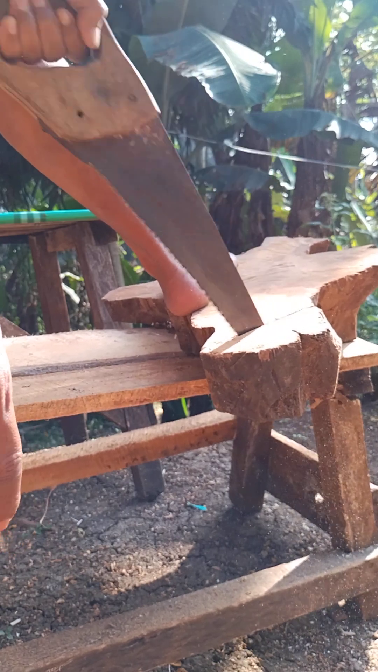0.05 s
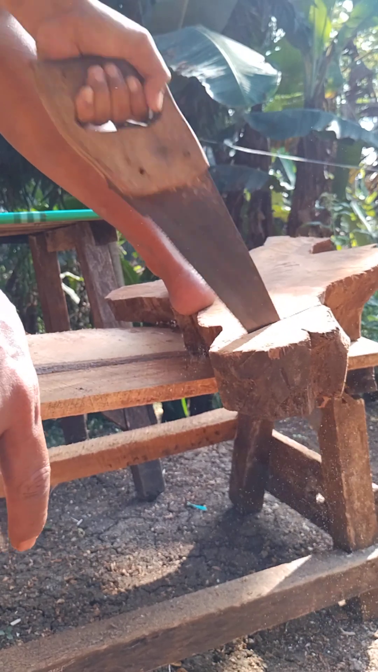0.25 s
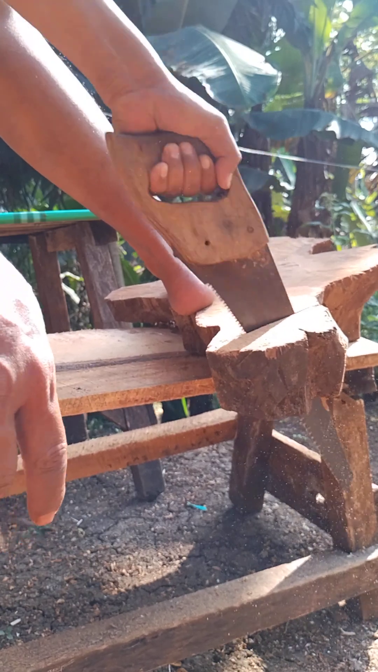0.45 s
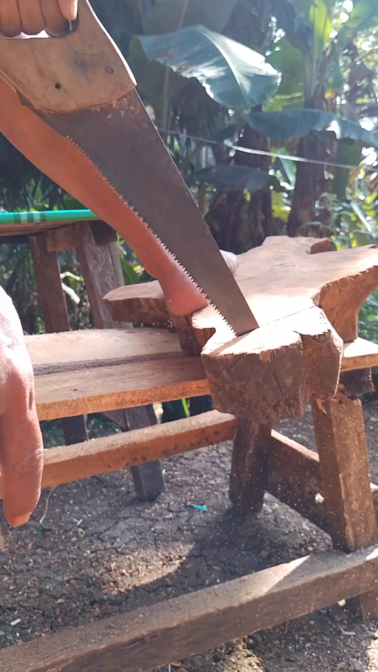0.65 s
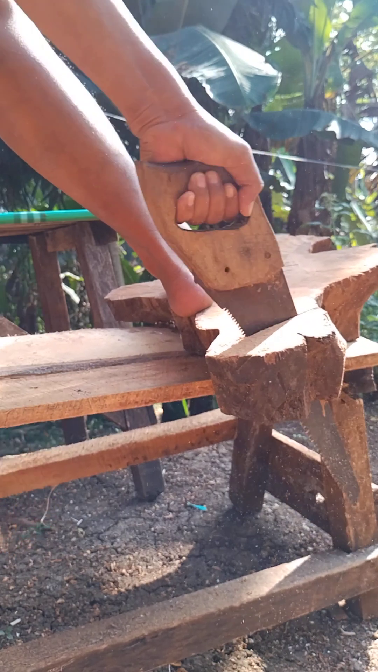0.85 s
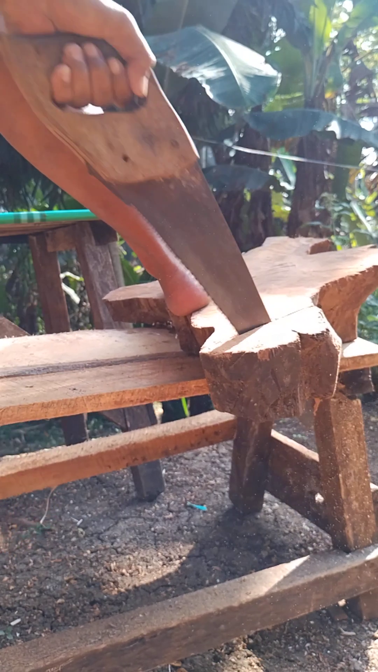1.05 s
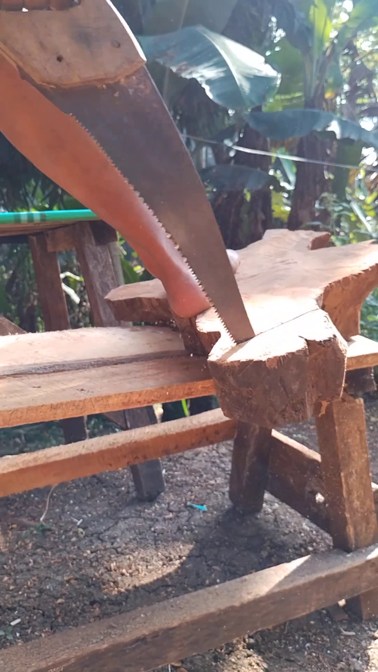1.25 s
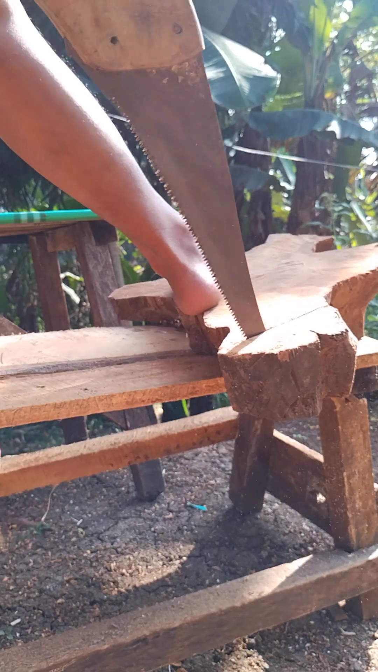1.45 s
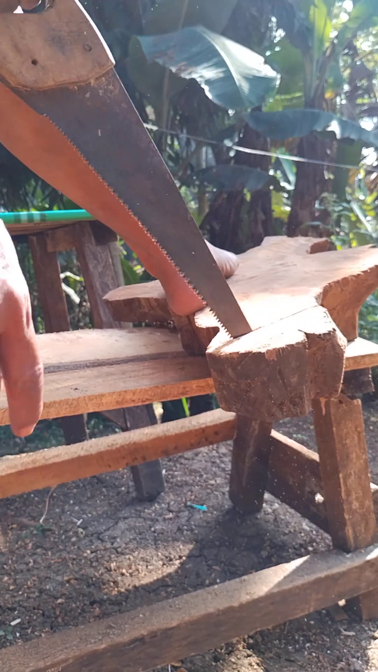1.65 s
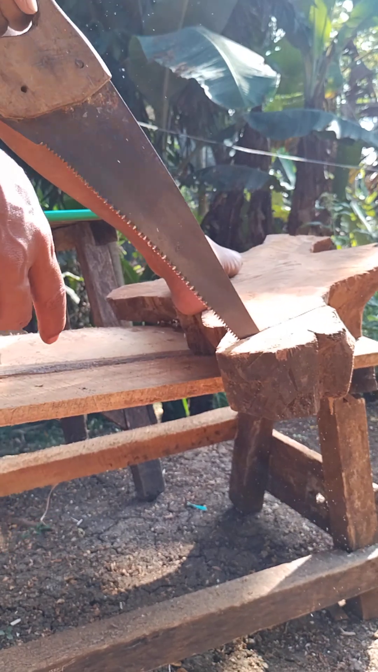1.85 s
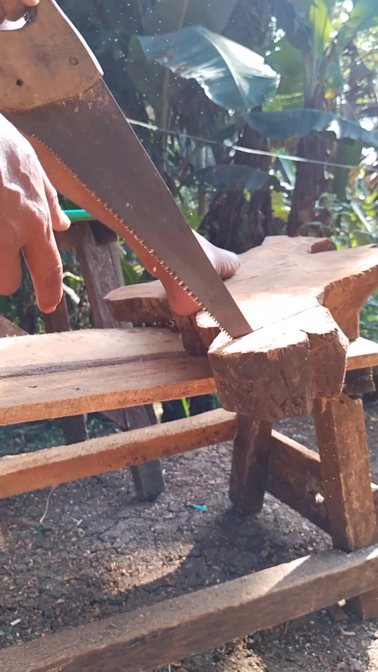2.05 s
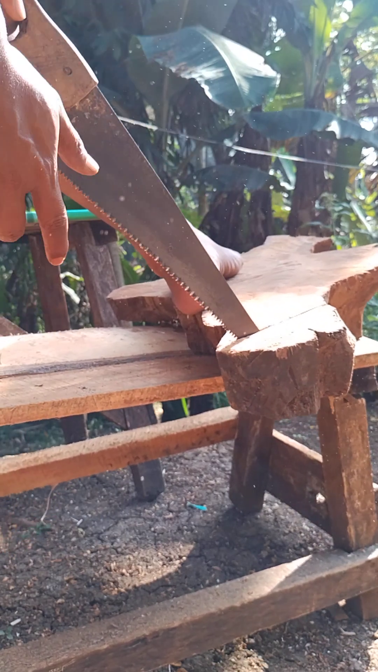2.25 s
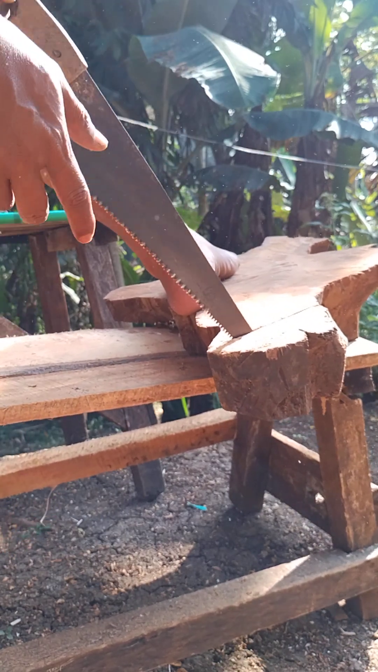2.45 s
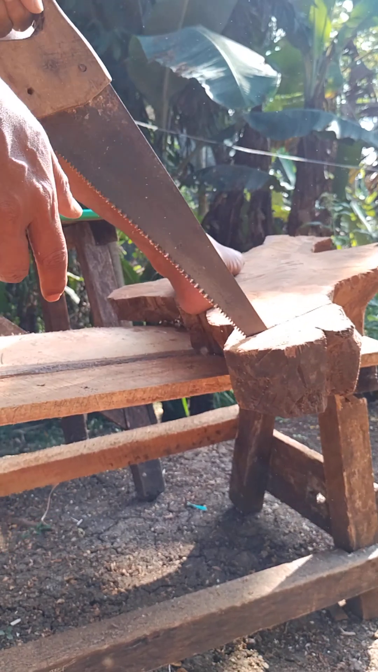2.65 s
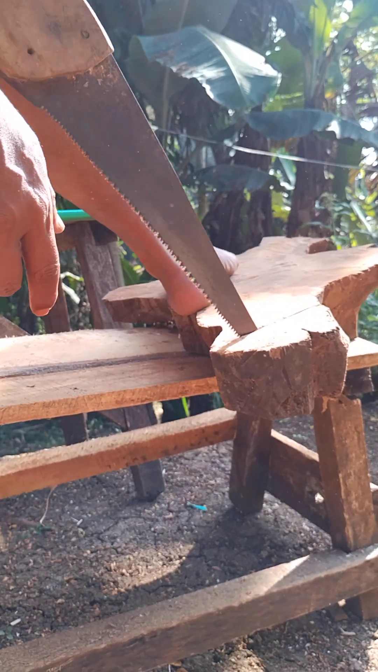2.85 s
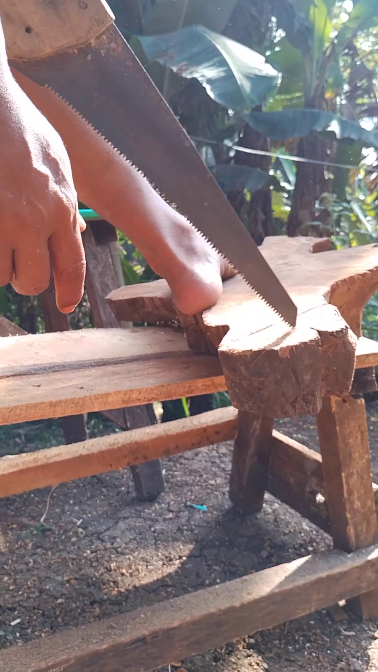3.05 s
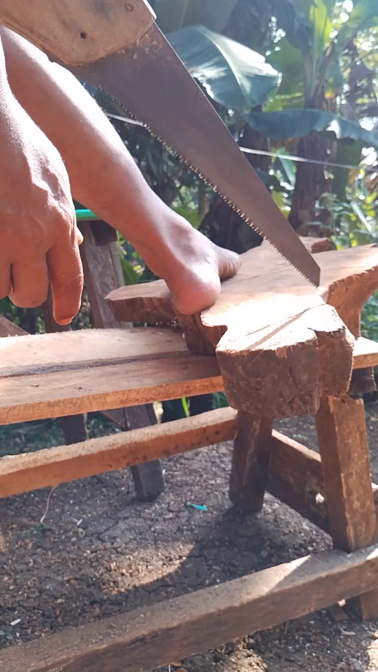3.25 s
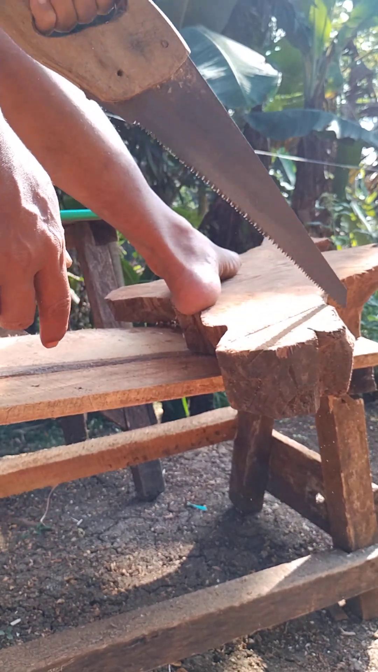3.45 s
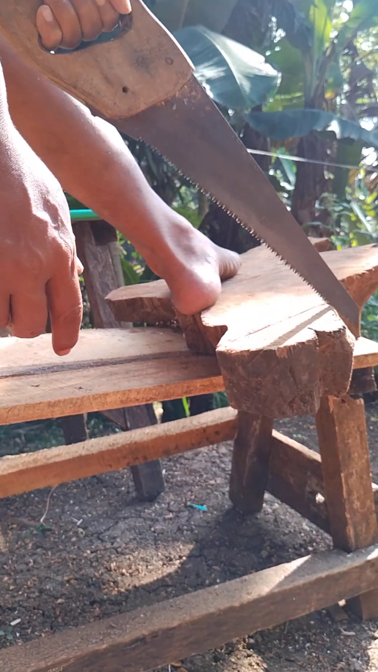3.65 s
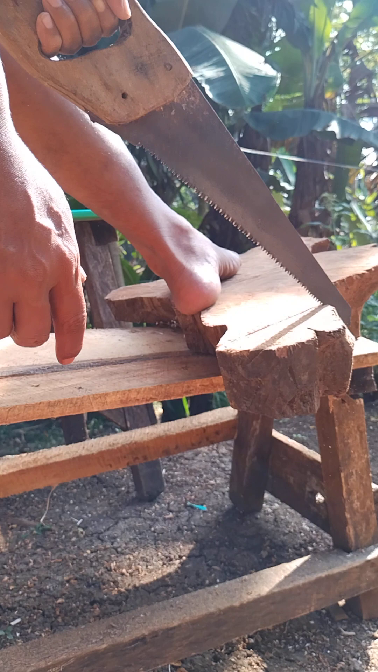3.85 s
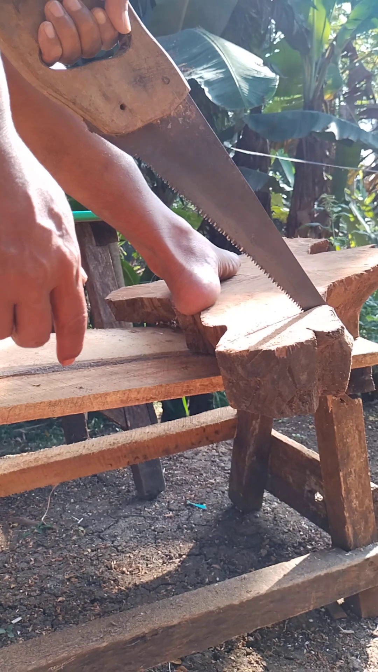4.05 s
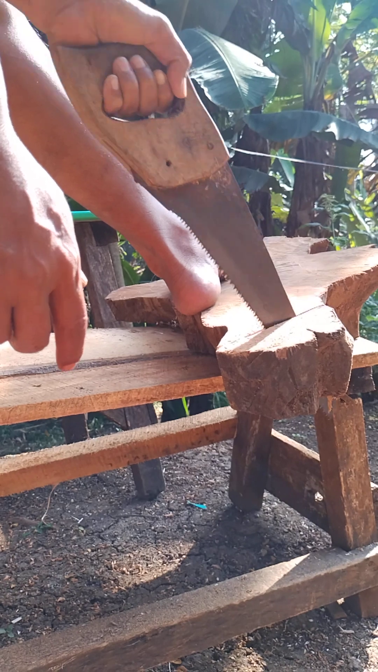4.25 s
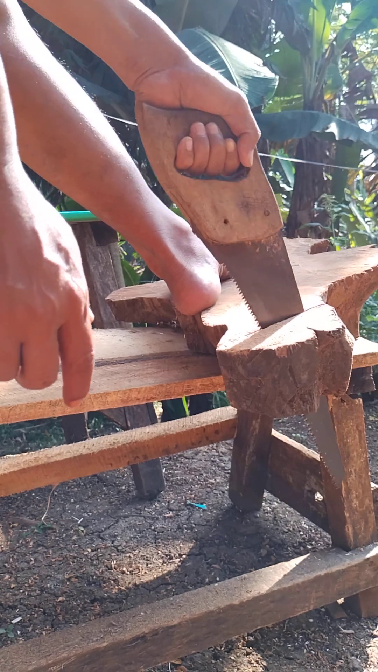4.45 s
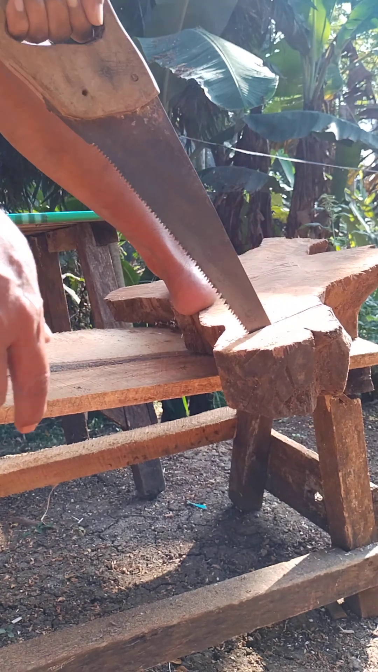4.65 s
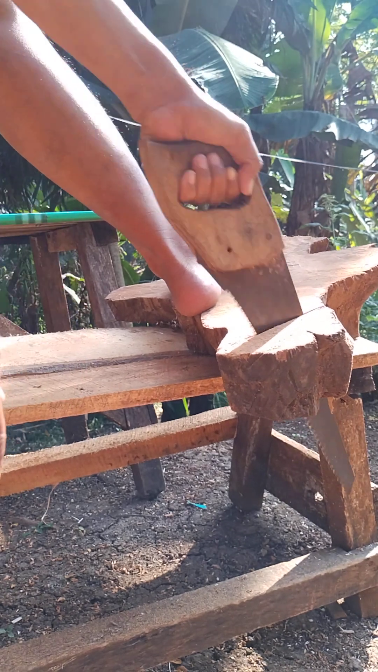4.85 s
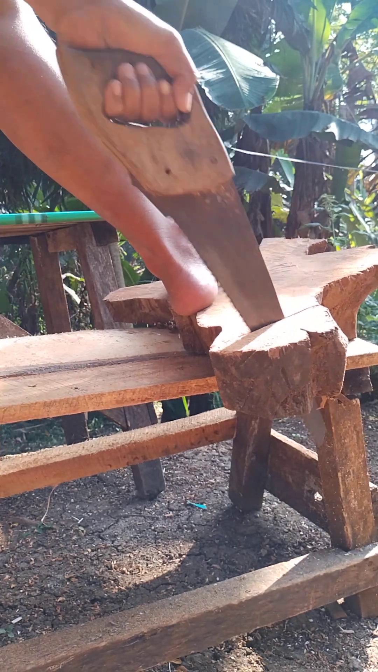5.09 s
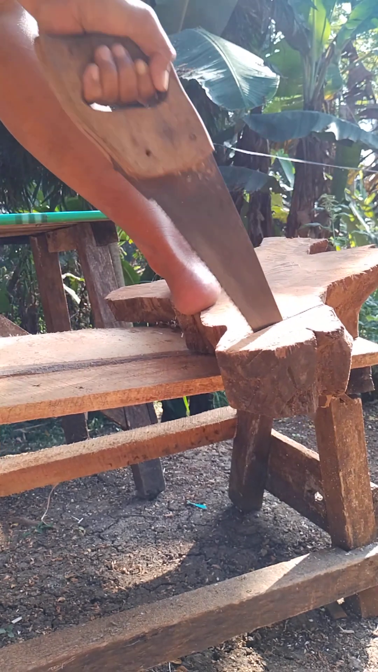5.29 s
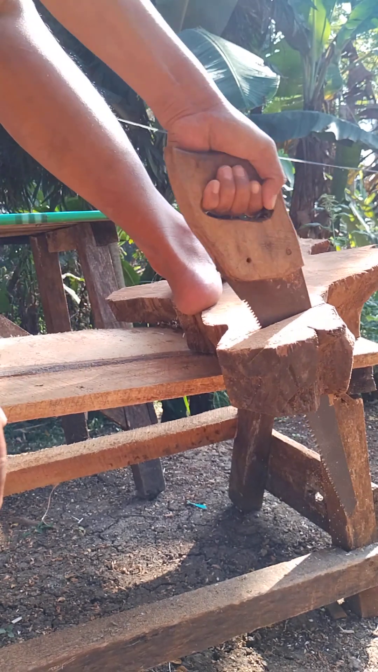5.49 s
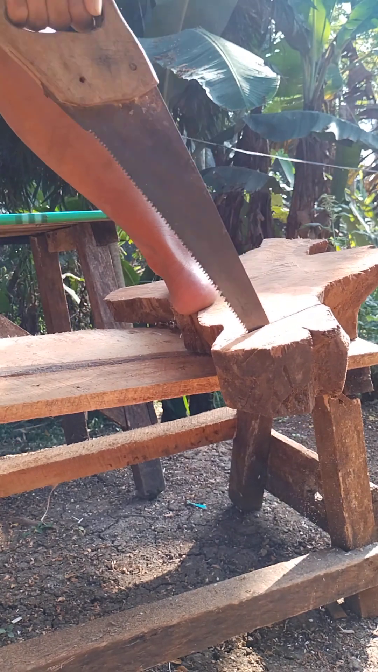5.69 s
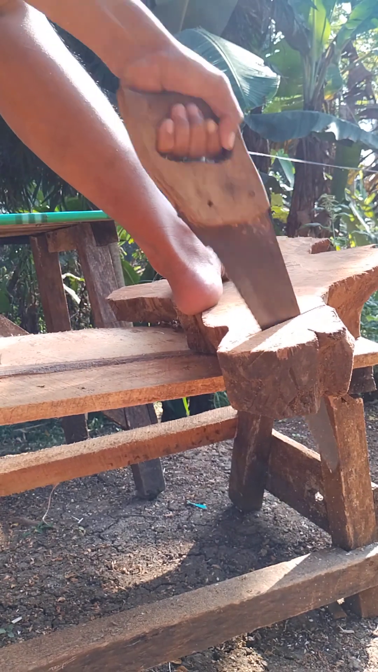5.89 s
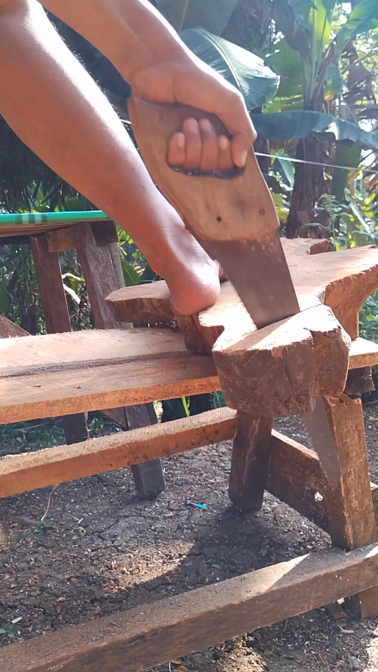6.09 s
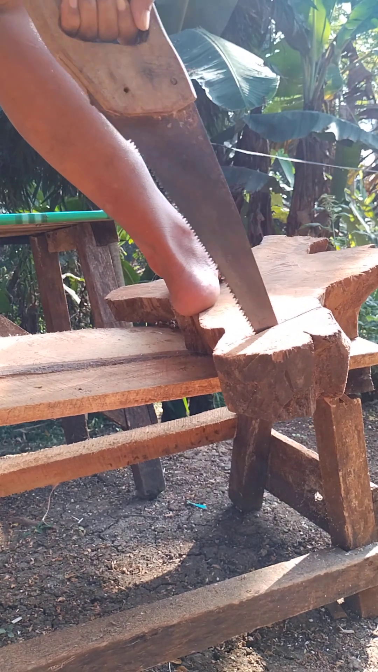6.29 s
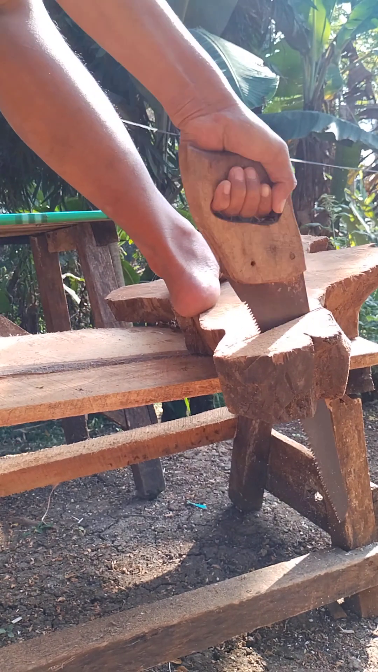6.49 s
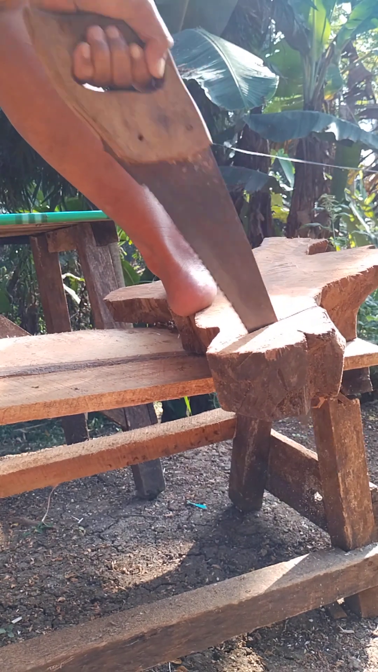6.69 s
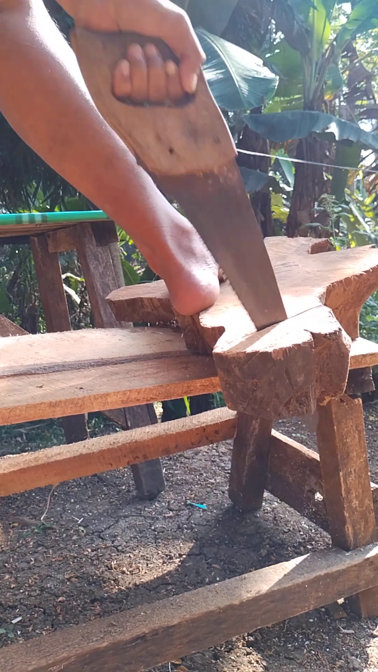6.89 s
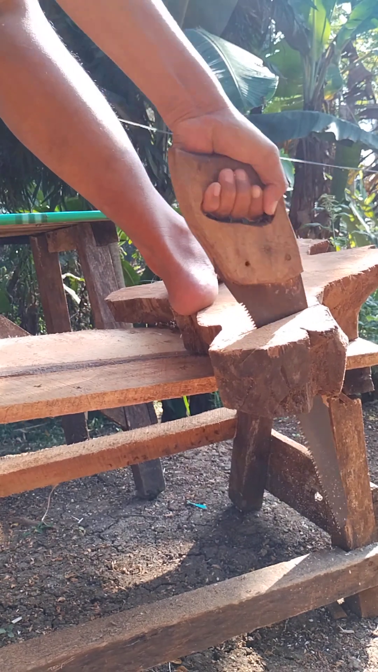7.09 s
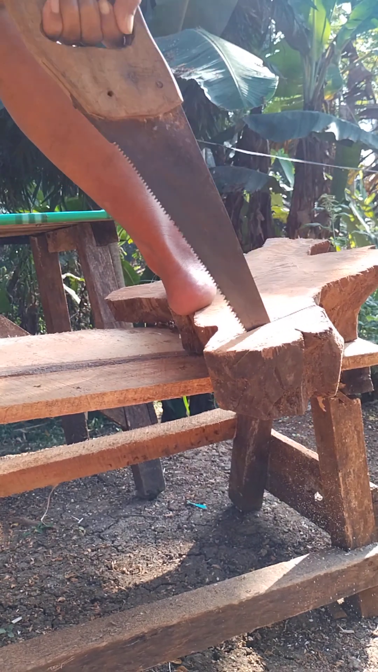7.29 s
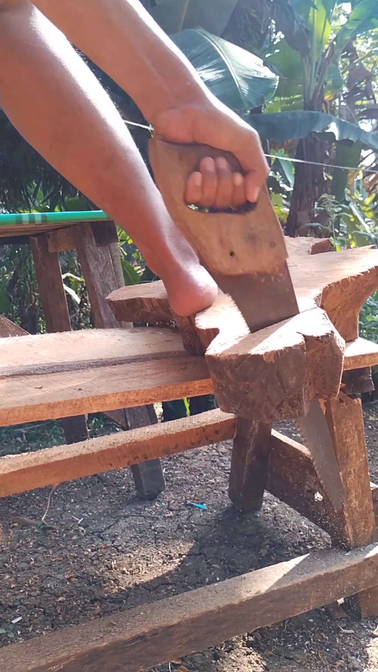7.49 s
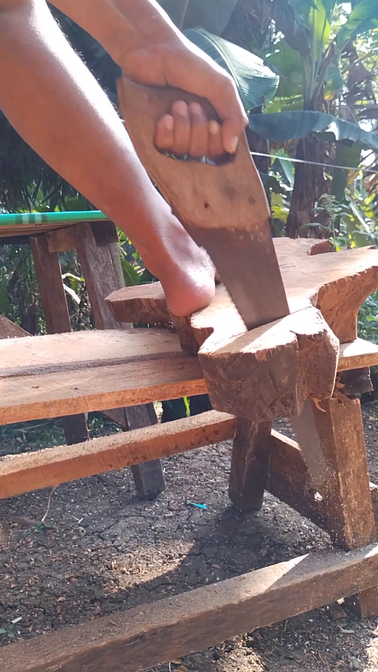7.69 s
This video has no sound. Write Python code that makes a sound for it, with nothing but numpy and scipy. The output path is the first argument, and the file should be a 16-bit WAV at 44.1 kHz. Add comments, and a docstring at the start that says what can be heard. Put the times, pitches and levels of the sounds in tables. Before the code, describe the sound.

A handsaw rasps through a hard log outdoors, pauses with light knocks and scrapes, then saws on over a high insect hiss.

```python
"""Handsaw on a log, outdoors

Close to a stereo microphone, a handsaw cuts a hard log on a bench, rests with light knocks and scrapes,
is set into the cut again and saws on. The teeth tear fibres in a dense crackle that rings blade and
wood. Behind are an insect chorus, one nearer cricket and a far engine; a breeze brushes the microphone."""
import sys
import numpy as np
from scipy import signal
from scipy.fft import rfft, irfft, next_fast_len
from scipy.io import wavfile
from scipy.ndimage import uniform_filter1d

SR = 44100
rng = np.random.default_rng(int(sys.argv[2]) if len(sys.argv) > 2 else 0)


def master_out(mix):
    """Clip the mix to full scale and print it as 16-bit PCM to the path in sys.argv[1]."""
    frames = np.transpose(np.atleast_2d(mix))
    ceiling = np.clip(frames, -1, 1)
    pcm = np.round(ceiling * 32767).astype(np.int16)
    wavfile.write(sys.argv[1], SR, pcm)


N = 340893
T = np.arange(N) / SR
SIZE = next_fast_len(N + 4096, True)
HZ = np.fft.rfftfreq(SIZE, 1 / SR)

# Table levels are relative; each source sets its own gain.
# far wash of the neighbourhood: (frequency [Hz], level [dB])
WASH_SPECTRUM = [(12, -35), (20, -0.5), (75, -13), (130, -4), (200, -9.5), (260, -16), (310, -22),
                 (500, -24), (1000, -32), (2000, -33.5), (4100, -39), (5300, -70)]
# far engine: (time [s], second order [Hz], its level [dB], third order level [dB])
ENGINE_ORDERS = [(0, 176, -65.5, -89), (.3, 182, -68, -84), (.45, 170, -72, -78), (1.3, 158, -83, -79),
                 (1.9, 162, -64, -74), (2.5, 162, -64, -71.5), (3.05, 160, -59.5, -71),
                 (3.3, 156, -96, -80), (3.8, 154, -93, -65.5), (4.5, 156, -78.5, -75.5),
                 (5.2, 150, -79, -70), (7.73, 147, -68, -71)]
# breeze on the microphone: (time [s], level [dB])
BREEZE_LEVELS = [(0, -57), (1.1, -61.5), (1.7, -64.5), (2.4, -62), (3.7, -73.5), (4.5, -62), (5.6, -62),
                 (5.75, -52), (5.9, -61.5), (7.73, -61.5)]
# far insects: (frequency [Hz], level [dB])
CHORUS_SPECTRUM = [(2940, -71.5), (5000, -56.5), (5800, -40.5), (6080, -42), (6560, -42.5), (7180, -35.5),
                   (7610, -26), (7940, -18.5), (8570, -6), (9750, -2.5), (11100, -15.5), (12400, -28.5),
                   (15600, -47.5)]
# nearer cricket: ((frequency [Hz], width [Hz]), level [dB])
CRICKET_NOTE = (4560, 300), -76

# pulls and pushes in turn, a pull first:
# (middle [s], rise [s], hold [s], release [s], tooth pressure [dB], change across the hold [dB])
SAW_STROKES = [(0.105, 0.095, 0.0341, 0.12, -46, 1.5), (0.39, 0.074, 0.057, 0.08, -46, -6),
               (0.639, 0.071, 0.099, 0.0715, -50.5, -4), (0.911, 0.1, 0.037, 0.06, -44.5, -7),
               (1.173, .12, 0.086, 0.084, -49.5, -3), (4.366, 0.037, 0.17, 0.069, -58, 6.5),
               (4.689, 0.11, 0.066, 0.06, -52, -1), (4.911, 0.085, 0.053, 0.0806, -46, 0),
               (5.188, 0.082, 0.0719, 0.1, -49.5, -2), (5.429, 0.078, 0.048, 0.094, -46.5, 1.3),
               (5.716, 0.091, 0.11, 0.051, -49.5, -3.9), (5.984, .13, 0.0322, 0.087, -47, 0),
               (6.235, 0.075, 0.077, 0.11, -51, -0.38), (6.489, 0.088, 0.046, 0.088, -48, 5.5),
               (6.761, 0.073, 0.11, 0.071, -51, -1), (7.031, 0.088, 0.047, 0.0902, -46, -3.5),
               (7.306, 0.1, 0.089, 0.077, -50, -1.5), (7.53, 0.0728, 0.03, .107, -45.5, 4.5),
               (7.805, 0.077, .07, .08, -48.5, -2.5)]
# the resting blade drags: (peak [s], rise [s], release [s], pressure [dB], wood's share [dB])
REST_SCRAPES = [(1.418, 0.187, 0.03, -73.5, -11), (1.494, 0.061, .08, -74.5, -6),
                (1.626, 0.036, 0.102, -72.5, -1), (1.746, 0.065, .06, -76.5, -16),
                (2.25, .15, 0.46, -89.5, 13.5), (2.594, 0.094, 0.067, -68.5, -4.5),
                (2.712, 0.011, 0.0463, -67.5, -15), (2.848, .02, 0.04, -75, -5),
                (2.99, 0.136, 0.22, -70, -1), (3.104, .008, 0.077, -64.5, 0.5), (3.16, .08, .03, -78, 2.5),
                (3.646, .015, 0.11, -80, 5), (3.806, .06, 0.077, -78.5, 5),
                (3.904, 0.054, 0.108, -66.5, 2.45), (3.966, .008, .15, -68, 1.5),
                (4.1, 0.041, 0.062, -64.5, 0.5)]
# the blade slips into the cut: (rise [s], hold [s], release [s], pressure [dB])
SLIP_SHAPE = (0.0433, 0.0024, 0.01, -48)
# blade touching wood: (time [s], note level [dB], note [Hz], log level [dB], scuff level [dB])
BLADE_KNOCKS = [(1.362, -71, 345, -71, -65), (1.409, -72, 417, -77, -67), (1.511, -69, 354, -75, -80),
                (1.620, -59, 370, -78, -61.5), (1.66, -68, 335, -81, -72), (2.212, -71, 449, -68, -80),
                (2.253, -78.5, 410, -68, -80), (2.593, -64, 337, -74, -63), (2.679, -67, 380, -69, -63.5),
                (2.708, -76.5, 330, -78, -62.5), (3.102, -50.5, 357, -50.5, -66),
                (3.137, -57, 354, -75, -78), (3.641, -67, 338, -62.5, -77), (3.793, -71, 975, -72, -75),
                (3.87, -75, 907, -75, -73), (3.962, -75, 991, -76, -55.5), (4.089, -79, 1014, -66, -78)]
# teeth catching as a stroke begins: (time [s], push level [dB], push [Hz], bench level [dB])
TOOTH_CATCHES = [(0.019, -56, 121, -59.5), (0.334, -49, 183, -59.5), (0.528, -51, 167, -65),
                 (0.838, -46.5, 199, -60.5), (1.029, -52, 250, -65), (4.858, -50, 178, -65),
                 (5.388, -53, 156, -69.5), (5.893, -48, 170, -61.5), (6.43, -47, 164, -61.5),
                 (6.645, -55.5, 218, -69), (6.965, -43.5, 138, -64), (7.169, -52, 164, -67.5),
                 (7.48, -55, 135, -73.5)]
# tearing fibres: (frequency [Hz], level [dB])
RASP_SPECTRUM = [(150, -51), (250, -20), (337, -12.5), (400, -15.5), (887, -7), (953, -7), (1500, -5),
                 (1810, -6.5), (2810, -9), (7500, 1), (9750, -3), (16500, -120)]
# bright hiss of the toothed edge: (frequency [Hz], level [dB])
EDGE_SPECTRUM = [(4000, -9), (7000, -7), (8500, 3), (10500, 2.5), (12000, -11), (14000, -10.5),
                 (15700, -17)]
# steel plate: (frequency [Hz], width [Hz], level [dB])
PLATE_MODES = [(1457, 16.8, 1), (1877, 170, -4.5), (2415, 680, -4.5), (3102, 560, -7.5), (3680, 23, 1),
               (3947, 30, -4), (4880, 57, -5.5), (5862, 36, -8)]
# blade bending between handle and cut, at zero depth: (frequency [Hz], width [Hz], level [dB])
BENDING_MODES = [(135, 35, 12), (230, 40, 8), (325, 45, 10), (480, 50, 10)]
# log and bench: (frequency [Hz], width [Hz], level [dB])
LOG_MODES = [(351.6, 12.5, 1.5), (545, 126, 0), (818.4, 27, 9.5), (960, 91, 3), (1395, 212, 0.5)]
BENCH_MODE, HOLLOW_MODE = (345, 25, 14), (965, 49, 12.9)  # same columns; driven by blade depth

# likeness of left and right: (frequency [Hz], coherence [0-1])
MIC_COHERENCE = [(30, 0.374), (130, 1), (300, 0.817), (640, 0.706), (1400, 0.153), (3000, 0.037),
                 (8000, 0.054)]
# colour of the microphone ports: (frequency [Hz], left minus right [dB])
MIC_BALANCE = [(60, 0.5), (130, 2), (290, -1.5), (640, 1), (3000, 0), (6500, 0), (8000, 5.5),
               (10500, -11.5), (12000, 2), (15000, -2.5)]

REST_S, SLIP_S = 1.3, 4.274  # the sawing stops; the blade slips back in
SHALLOW, DEEP = 0.1, 0.931  # blade depth after a pull and after a push (0-1)
FIRM_DB = -50  # tooth pressure of a firm stroke
WOOD_SLOPE, BRIGHT_SLOPE = -0.17, 0.045  # change of the wood's and the edge's share per dB of pressure


def gain_of(db):
    """Decibels to a factor."""
    return 10 ** (np.asarray(db) / 20)


def evened(x):
    """Scales to rms 1."""
    return x / np.sqrt(np.mean(x ** 2) + 1e-20)


def on_bins(points, outside=None):
    """A spectrum table on every frequency bin."""
    hz, value = np.transpose(points)
    return np.interp(np.log(HZ + 1), np.log(hz + 1), value, outside, outside)


def on_samples(rows):
    """The columns of a time table on every sample."""
    times, *columns = np.transpose(rows)
    return [np.interp(T, times, column) for column in columns]


def filtered(x, gain):
    """Multiplies the spectrum by a gain."""
    return irfft(rfft(x, SIZE) * gain, SIZE)[..., :N]


def coloured(x, spectrum):
    """Gives x a spectrum; white noise keeps its rms."""
    gain = gain_of(on_bins(spectrum, -100))
    return filtered(x, gain / np.sqrt(np.mean(gain ** 2)))


def drift(rate_hz):
    """Slow random wander of rms about 1."""
    step, draws = 32, 16384
    count = N // step + 2
    fade = np.exp(-(np.fft.rfftfreq(draws, step / SR) / rate_hz) ** 2)
    coarse = evened(irfft(rfft(rng.standard_normal(draws)) * fade)[:count])
    return np.interp(np.arange(N) / step, np.arange(count), coarse)


def ring(x, modes):
    """Sum of the fixed modes of a body."""
    return sum(gain_of(db) * signal.lfilter(*signal.iirpeak(hz, hz / width, SR), x)
               for hz, width, db in modes)


def gliding_mode(x, hz, width):
    """A resonance of gain 1 that follows the curve hz."""
    turn = np.exp(2j * np.pi * np.cumsum(hz) / SR)
    pole = np.exp(-np.pi * width / SR)
    return 2 * (turn * signal.lfilter([1 - pole], [1, -pole], x / turn)).real


def crackle(per_s, spread_db, length_s):
    """Two channels of noise in short random bursts of uneven size."""
    size = gain_of(spread_db * np.minimum(rng.exponential(1, N), 4))
    size *= rng.random(N) < per_s / SR
    power = signal.lfilter([1], [1, -np.exp(-1 / (length_s * SR))], size ** 2)
    return evened(np.sqrt(power) * rng.standard_normal((2, N)))


def swell(middle, rise, hold, release, db, tilt_db=0):
    """Pressure of one contact: a sloping hold between rounded flanks of 30 dB."""
    early = np.maximum(middle - hold / 2 - T, 0) / rise
    late = np.maximum(T - middle - hold / 2, 0) / release
    slope = tilt_db * np.clip((T - middle) / max(hold, 1 / SR), -.5, .5)
    return gain_of(db + slope - 30 * (early + late) ** 1.5)


def at_microphone(x, left_lag_s=0):
    """Two signals become left and right, alike in the bass, apart in the treble."""
    same = np.clip(on_bins(MIC_COHERENCE), 0, 1)
    left = filtered(x[0], np.exp(-2j * np.pi * HZ * left_lag_s))
    right = filtered(x[0], same) + filtered(x[1], np.sqrt(1 - same ** 2))
    return np.array([left, right])


def neighbourhood():
    """A low, nearly steady wash from far off."""
    return gain_of(-65 + drift(10)) * coloured(rng.standard_normal((2, N)), WASH_SPECTRUM)


def engine():
    """A distant engine drones on two wavering orders of its rotation."""
    second_hz, second_db, third_db = on_samples(ENGINE_ORDERS)
    turns = np.cumsum(second_hz / 2 + drift(7.18)) / SR
    return sum(gain_of(db - 1.5 + 4.6 * drift(4.9)) * np.sin(2 * np.pi * order * turns)
               for order, db in ((2, second_db), (3, third_db)))


def breeze():
    """Air rumbles unevenly on the microphone."""
    rumble = coloured(rng.standard_normal((2, N)), [(15, -1), (30, -12), (70, -4.5), (110, -29)])
    return gain_of(on_samples(BREEZE_LEVELS)[0] - 6.5 + 4 * drift(6)) * rumble


def insect_chorus():
    """Many far singers blur into a high hiss."""
    hiss = coloured(crackle(per_s=9000, spread_db=1, length_s=0.0005), CHORUS_SPECTRUM)
    return gain_of(-44 + 0.22 * drift(13)) * hiss


def cricket():
    """One nearer cricket trills on the narrow note of its sharply tuned wing."""
    (hz, width), db = CRICKET_NOTE
    note = rng.standard_normal((2, N))
    for _ in range(3):
        note = ring(note, [(hz, width, 0)])
    trill_hz = 78 + 6.04 * drift(3.48)
    trill = 1 + 0.27 * np.cos(2 * np.pi * np.cumsum(trill_hz) / SR)
    return gain_of(db - 1.1 + 0.85 * drift(18)) * trill * evened(note)


def yard_echoes(x, rt60_s=0.058):
    """Sparse echoes from bench, ground and trees, dying quickly."""
    taps = np.zeros((2, 12000))
    delays = np.arange(200, 11980, 20) + rng.integers(0, 20, (2, 589))
    np.put_along_axis(taps, delays, rng.choice([-1., 1.], delays.shape), 1)
    taps *= gain_of(-60 * T[:12000] / rt60_s)
    return signal.fftconvolve(x, taps / np.linalg.norm(taps[0]), axes=1)[:, :N]


def blade_knocks():
    """Each touch of the resting blade sounds a note, rubs the log modes and scuffs the steel."""
    notes, rub, scuff = np.zeros((3, N))
    t = T[:6000]
    for s, db, hz, log_db, scuff_db in BLADE_KNOCKS:
        at = round(s * SR) + np.arange(len(t))
        envelope = np.minimum(t / 0.003, 1) * np.exp(-t / 0.01081)
        notes[at] += gain_of(db + 1) * envelope * np.sin(2 * np.pi * hz * t)
        rub[at] += gain_of(log_db) * np.minimum(t / 0.0017, 1) * np.exp(-t / 0.0047)
        scuff[at] += gain_of(scuff_db) * np.exp(-t / 0.0025)
    grit = rng.standard_normal((2, N))
    log = gain_of(11.5) * ring(rub * grit, LOG_MODES)
    steel = gain_of(7) * coloured(scuff * grit, RASP_SPECTRUM)
    return notes + log + steel


def tooth_catches():
    """The teeth catch with a low push that knocks the bench."""
    thumps, t = np.zeros(N), T[:6000]
    for s, db, hz, bench_db in TOOTH_CATCHES:
        push = gain_of(db + 4.5) * np.sin(2 * np.pi * hz * t) * t / 0.0052 * np.exp(-t / 0.0036)
        bench = gain_of(bench_db + 7) * np.sin(2 * np.pi * 390 * t) * np.exp(-t / 0.0075)
        thumps[round(s * SR):][:len(t)] += push + bench
    return thumps


def blade_depth():
    """The blade travels between deep and shallow on each stroke; the hand slows at the turns."""
    middle, rise, hold, release = np.transpose(SAW_STROKES)[:4]
    starts, ends = middle - hold / 2 - rise, middle + hold / 2 + release
    turns = np.maximum.accumulate(np.ravel([starts, ends], "F"))
    depth = np.interp(T, turns, np.resize([DEEP, SHALLOW, SHALLOW, DEEP], len(turns)))
    return uniform_filter1d(depth, size=4000)


def tooth_forces(depth):
    """How hard the strokes, scrapes and slip drive the steel, the wood and the bright edge."""
    snag = gain_of(0.96 * drift(35))  # the teeth snag and let go
    touch = gain_of(-86) * ((T < REST_S) | (T > SLIP_S))  # they still touch at each turn
    press = snag * (sum(swell(*stroke) for stroke in SAW_STROKES) + touch)
    firmness = press / gain_of(FIRM_DB)
    slip = swell(SLIP_S, *SLIP_SHAPE)
    steel = press + slip
    wood = gain_of(FIRM_DB - 5 + 4 * (depth - .5)) * firmness ** (1 + WOOD_SLOPE) + gain_of(-11) * slip
    edge = gain_of(FIRM_DB - 3.5) * firmness ** (1 + BRIGHT_SLOPE) + gain_of(1) * slip
    for s, rise, release, db, wood_db in REST_SCRAPES:
        drag = snag * swell(s, rise, 0, release, db)
        steel += drag
        wood += gain_of(wood_db) * drag
        edge += gain_of(-12) * drag
    return steel, wood, edge


def saw_body(shake, depth):
    """The low voice of the cut: log, bench and the bending blade."""
    climb = 2 ** (2.314 * depth)  # the modes rise as the free length shortens
    bending = sum(gain_of(db) * gliding_mode(shake, hz * climb, width)
                  for hz, width, db in BENDING_MODES)
    bench = ring(depth ** 2 * shake, [BENCH_MODE])  # a deep blade rocks the bench
    hollow = ring((1.1 - depth) ** 2 * shake, [HOLLOW_MODE])  # the tip rings the log
    return 1.48 * shake + bending + bench + hollow + ring(shake, LOG_MODES)


def handsaw(crossover_hz=1300):
    """Each torn fibre is a burst: the crackle rings wood below and steel above, topped by the edge."""
    depth = blade_depth()
    steel_force, wood_force, edge_force = tooth_forces(depth)
    fibres = coloured(crackle(per_s=2500, spread_db=-0.5, length_s=0.0016), RASP_SPECTRUM)
    rasp = steel_force * fibres
    # each plate mode wakes and dies as the kerf grips the steel
    plate = sum(ring(gain_of(3.47 * drift(24)) * rasp, [mode]) for mode in PLATE_MODES)
    lowpass = signal.butter(2, crossover_hz, fs=SR, output="sos")
    highpass = signal.butter(2, crossover_hz, "high", fs=SR, output="sos")
    low = signal.sosfilt(lowpass, saw_body(wood_force * fibres, depth))
    high = signal.sosfilt(highpass, rasp + gain_of(6.5) * plate)
    edge = coloured(crackle(per_s=3900, spread_db=-2.5, length_s=0.00109), EDGE_SPECTRUM)
    edge *= gain_of(11 + 1.07 * drift(58)) * edge_force
    return gain_of(3.5) * low + gain_of(2.5) * high + edge


def scene():
    """The work at the bench up close, with its echoes, over the insects and the far sounds."""
    work = handsaw() + blade_knocks() + tooth_catches()
    direct = at_microphone(gain_of(2.5) * work, left_lag_s=7e-5)
    echoes = gain_of(-7.5) * yard_echoes(work)
    background = at_microphone(insect_chorus() + cricket() + neighbourhood() + breeze()) + engine()
    return background + echoes + direct


def record(dry, cutoff_hz=15784):
    """The microphone's two ports differ in colour, and the top treble is cut off."""
    ports = filtered(dry, gain_of(np.outer([.5, -.5], on_bins(MIC_BALANCE))))
    lowpass = signal.firwin(1023, cutoff_hz, window=("kaiser", 9), fs=SR)
    return signal.oaconvolve(ports, lowpass[None], "same")


dry = scene()
out = record(dry)
master_out(out)
```